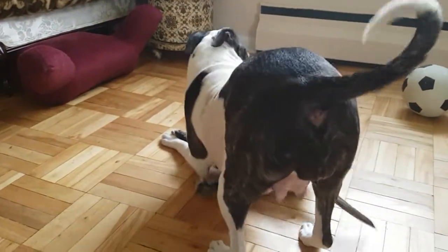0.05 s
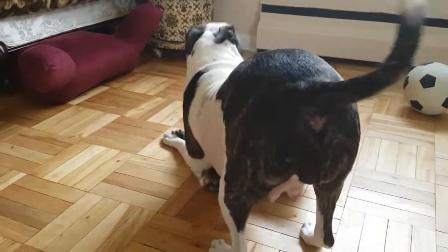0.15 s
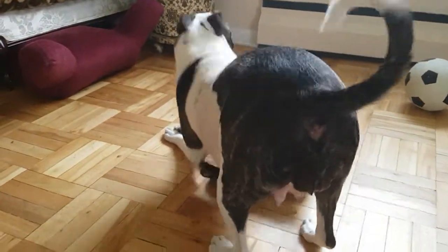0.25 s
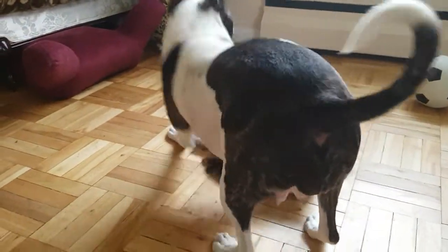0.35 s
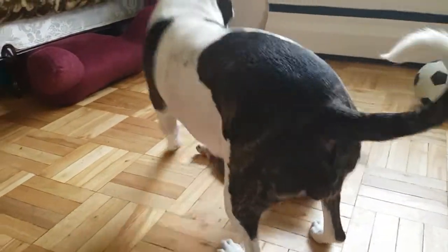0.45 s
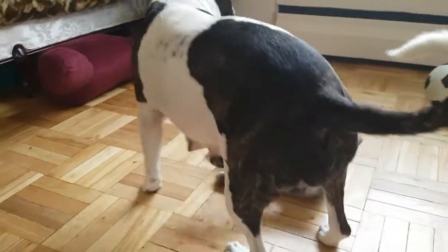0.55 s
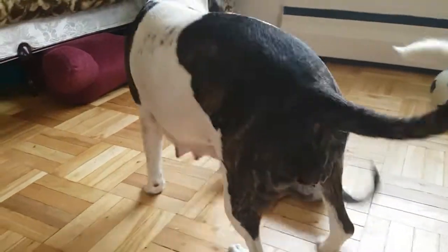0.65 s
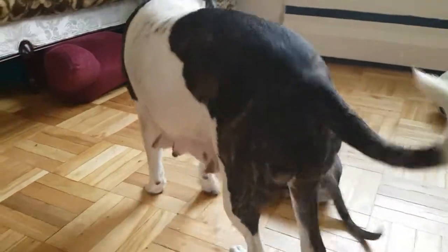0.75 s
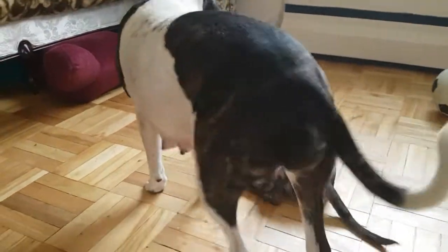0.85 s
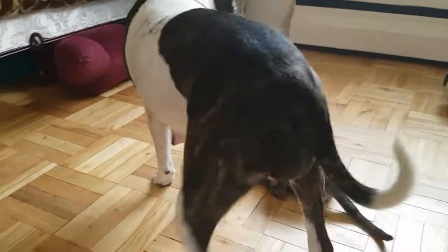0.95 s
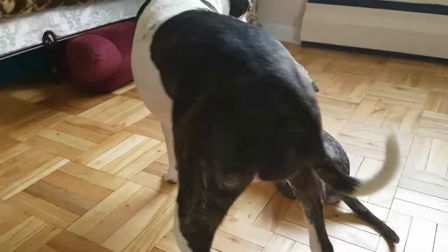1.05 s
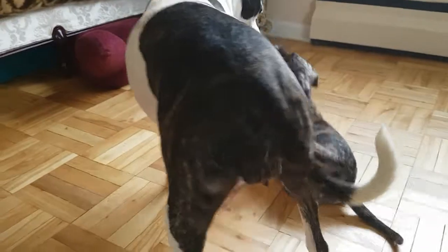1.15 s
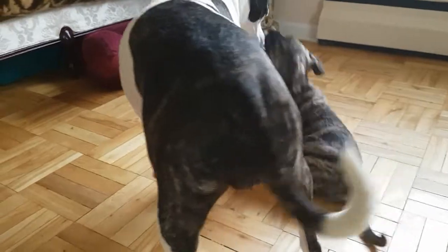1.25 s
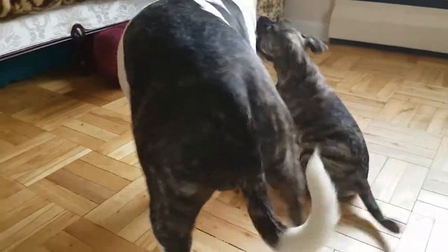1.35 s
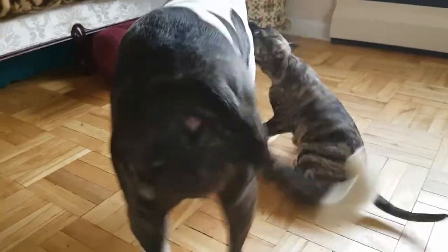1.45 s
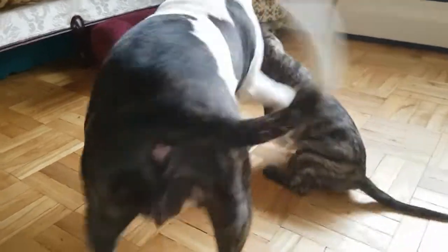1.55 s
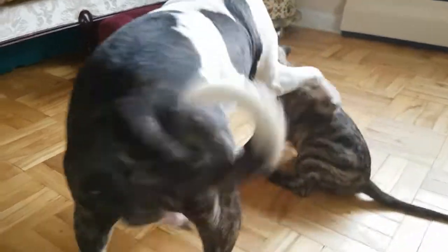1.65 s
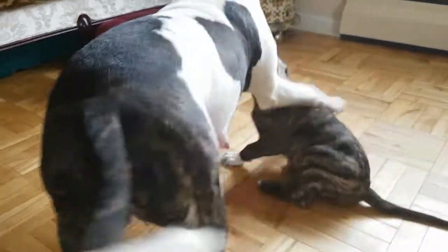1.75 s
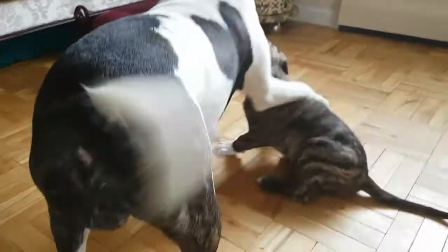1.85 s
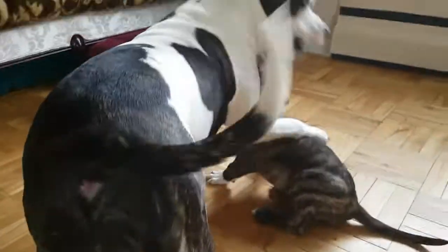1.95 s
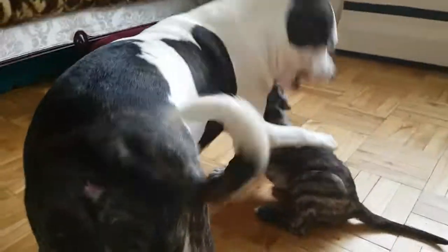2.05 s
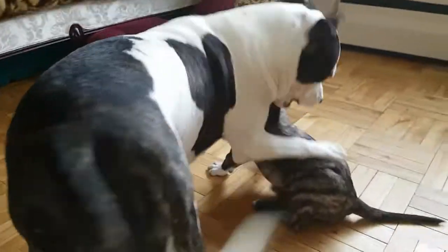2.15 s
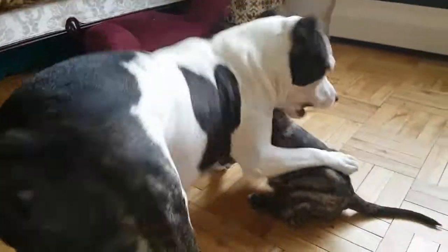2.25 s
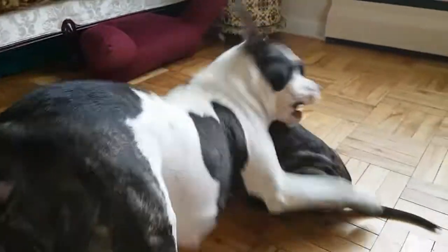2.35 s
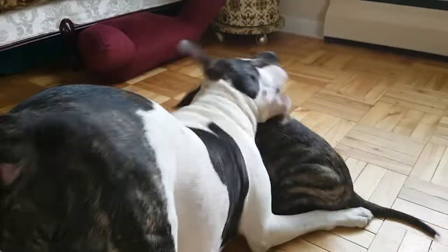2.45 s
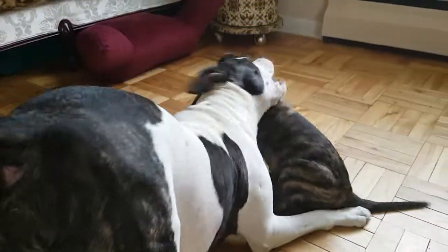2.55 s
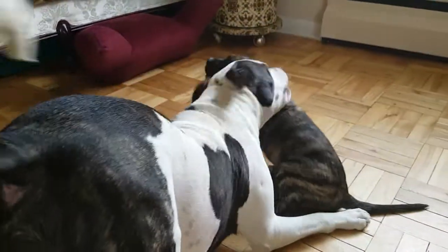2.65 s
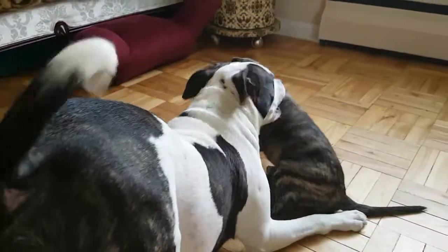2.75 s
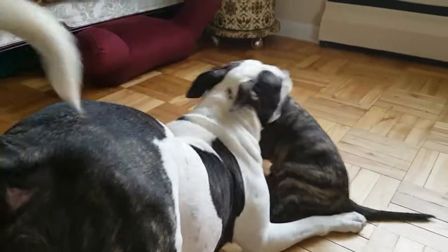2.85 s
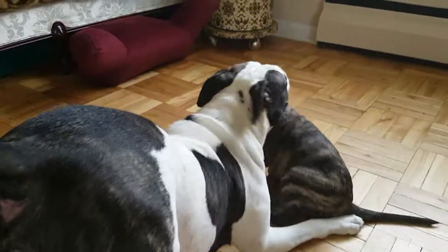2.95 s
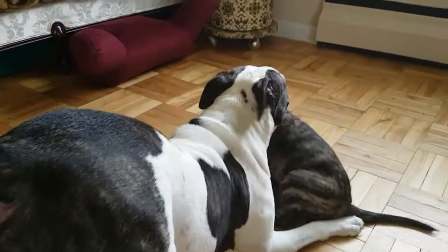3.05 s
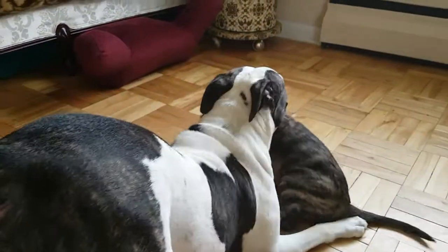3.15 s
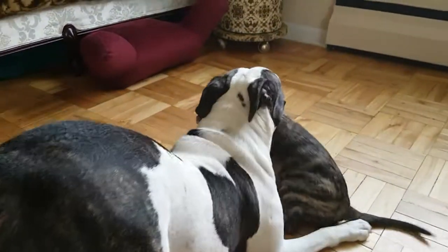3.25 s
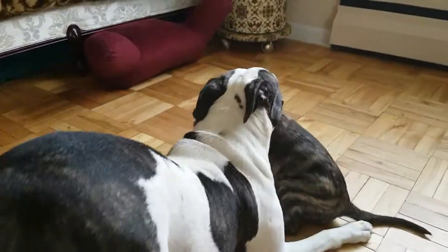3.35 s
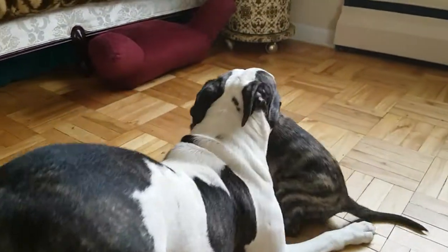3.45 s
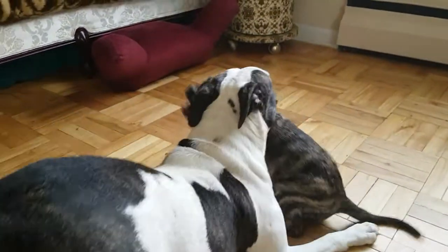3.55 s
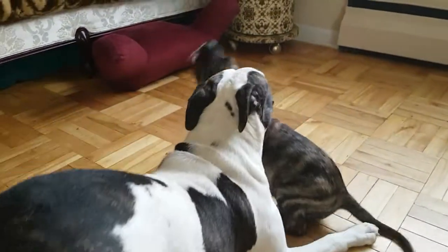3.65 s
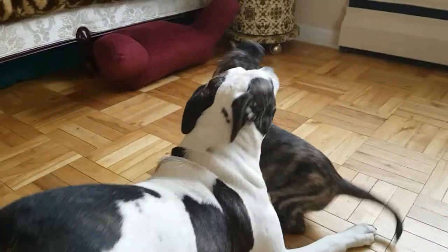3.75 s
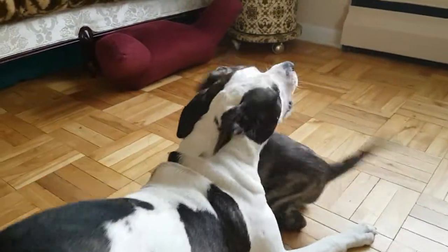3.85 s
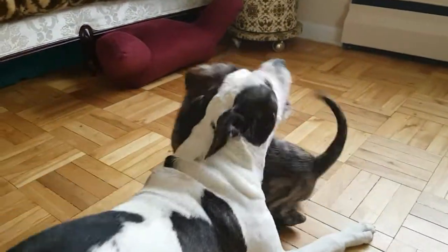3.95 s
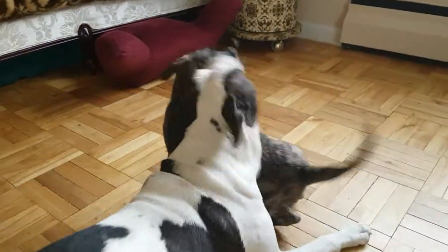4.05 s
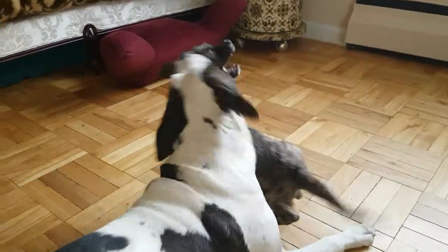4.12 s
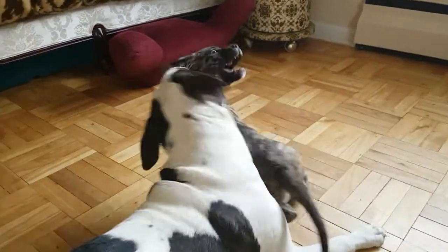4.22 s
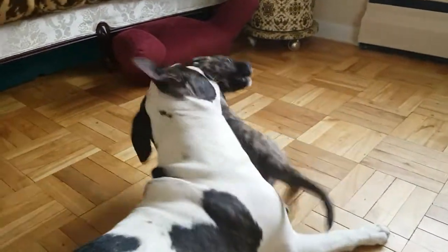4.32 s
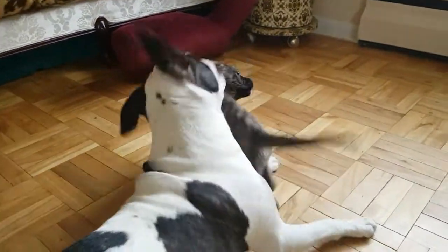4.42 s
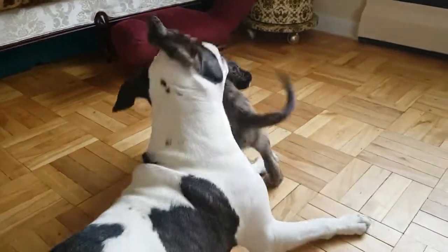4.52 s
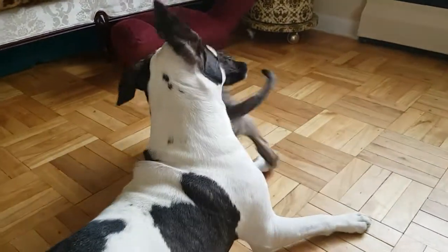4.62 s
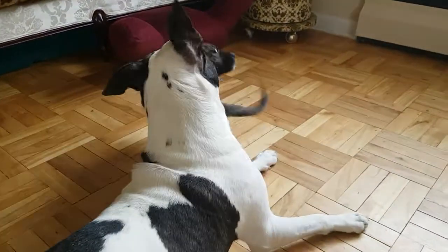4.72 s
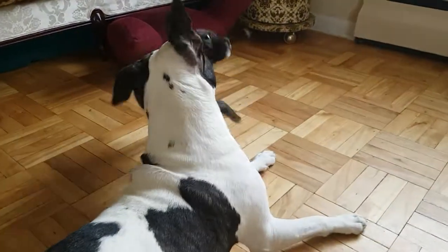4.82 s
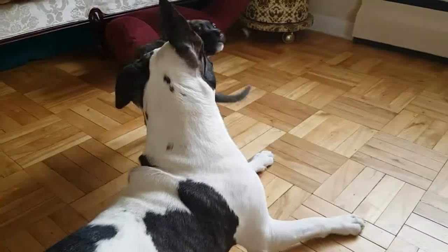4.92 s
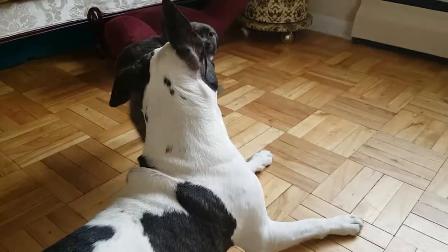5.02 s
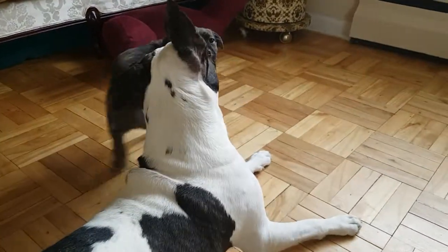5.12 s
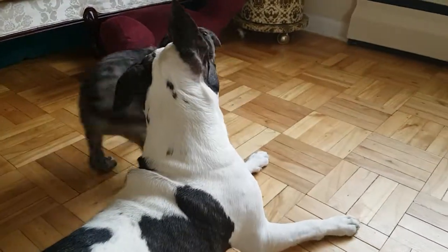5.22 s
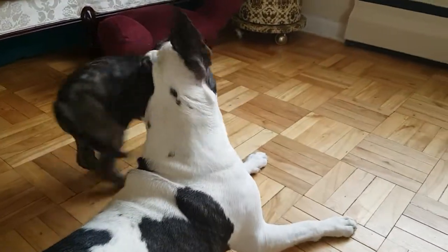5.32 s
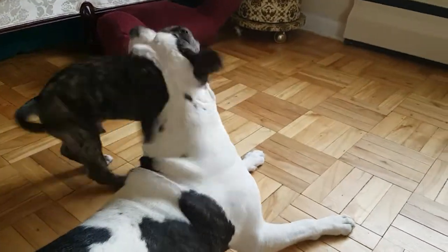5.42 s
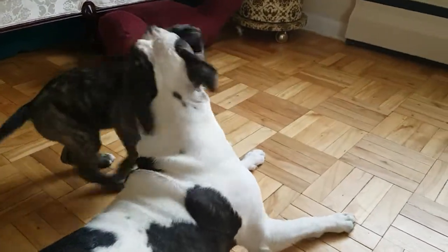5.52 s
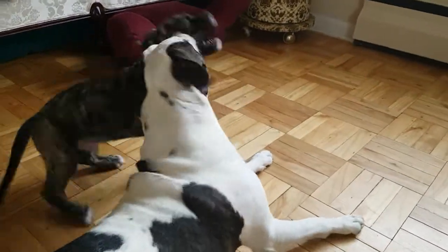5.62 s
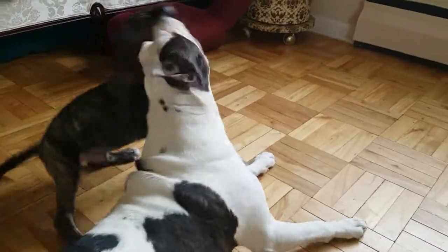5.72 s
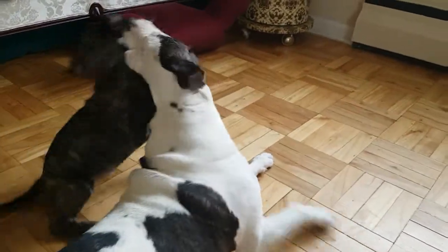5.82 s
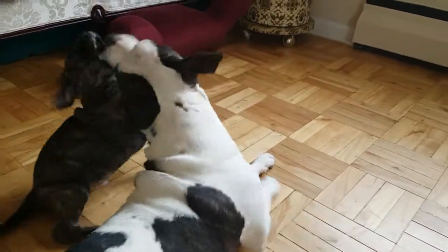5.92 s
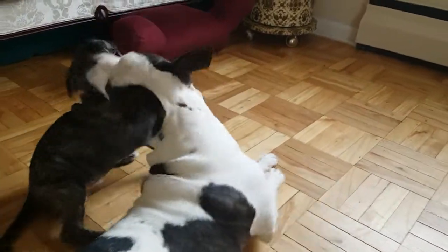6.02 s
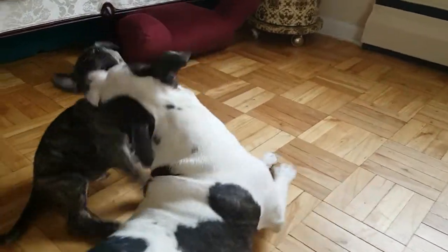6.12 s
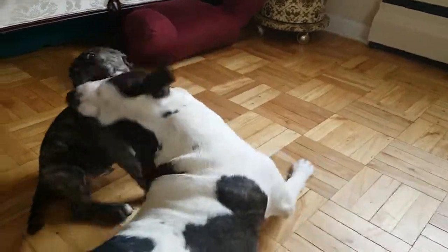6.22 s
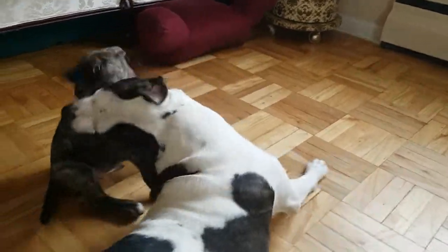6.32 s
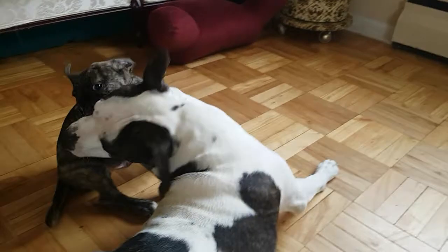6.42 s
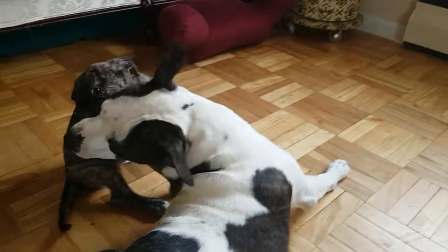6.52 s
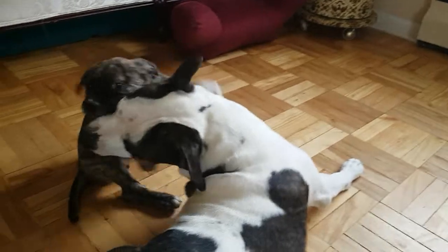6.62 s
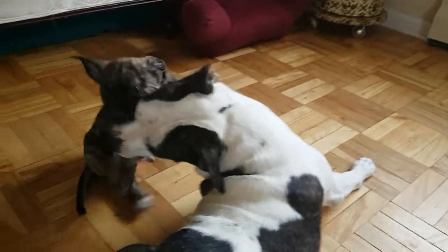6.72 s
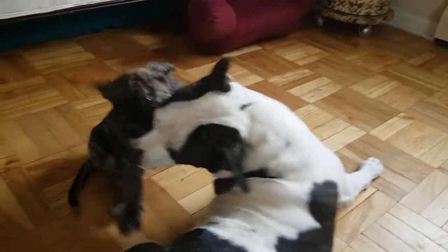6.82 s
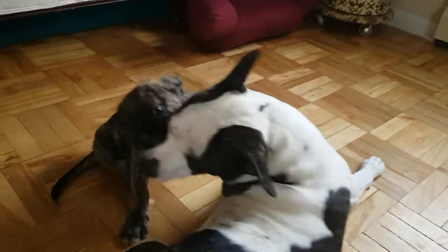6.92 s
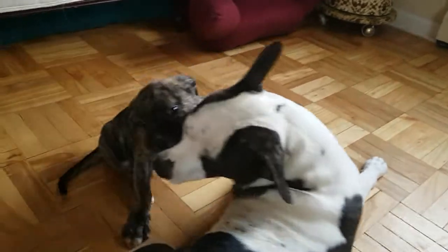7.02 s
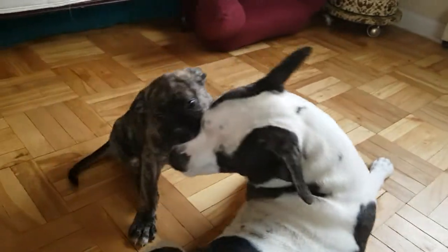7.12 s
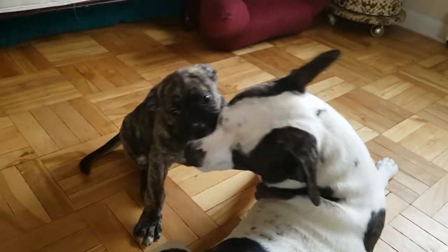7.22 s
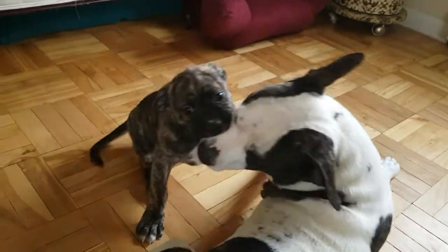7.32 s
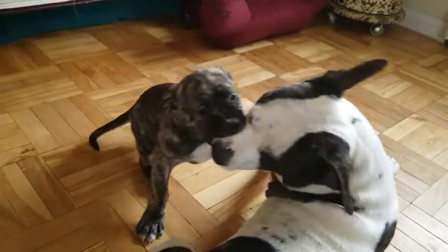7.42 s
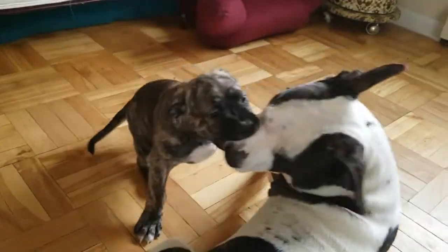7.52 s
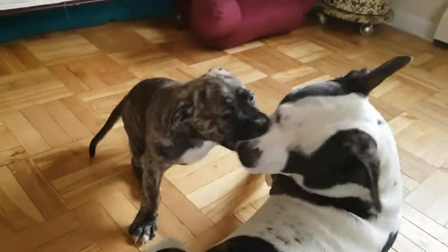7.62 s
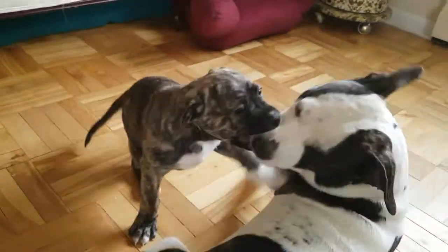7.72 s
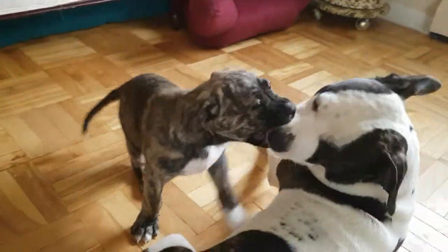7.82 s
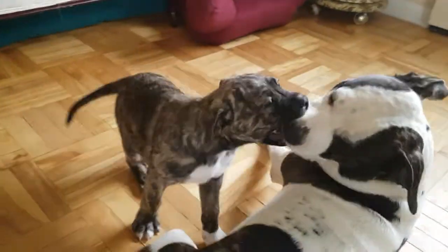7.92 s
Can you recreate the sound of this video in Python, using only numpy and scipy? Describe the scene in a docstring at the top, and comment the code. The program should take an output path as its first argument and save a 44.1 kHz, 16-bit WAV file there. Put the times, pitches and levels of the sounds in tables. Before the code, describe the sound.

Two dogs tussle on a parquet floor: claws click, paws knock and scuff, one heavy hollow thump lands, over a low hum.

```python
"""A small living room with a parquet floor, where a big dog and a puppy wrestle.
Paws knock, skid and scrape: blows ring floor modes, skids and scrapes are band-limited noise and catches.
Claws snap and ring, lips crackle and ring a mouth cavity, coats rub as noise that follows the movement.
Once the big dog drops onto its elbows and the whole deck rings.
Behind them an appliance hums in wavering sines over a bed of noise; echoes and a tail form the room."""
import sys
import numpy as np
from scipy import signal
from scipy.fft import rfft, irfft, next_fast_len
from scipy.io import wavfile
from scipy.ndimage import map_coordinates

SR = 44100
rng = np.random.default_rng(int(sys.argv[2]) if len(sys.argv) > 2 else 0)


def to_wav(s):
    """Save 16-bit WAV."""
    ch = np.atleast_2d(s).T  # columns
    pcm = np.round(np.clip(ch, -1, 1) * 32767)  # PCM
    wavfile.write(sys.argv[1], SR, pcm.astype(np.int16))


N = 351477
TIME = np.arange(N) / SR
AGE = np.arange(SR // 3) / SR  # seconds since a contact


def from_db(db):
    """Amplitude of a level in dB."""
    return 10 ** (np.asarray(db) / 20)


def rms_one(x):
    """Scale to rms 1."""
    return x / np.sqrt(np.mean(x ** 2) + 1e-20)


def attack_one(x):
    """Scale a blow so that its first 8 ms have rms 1."""
    return x / np.sqrt(np.mean(x[:SR // 125] ** 2) + 1e-20)


def at_hz(points, hz):
    """Read a table on a log-frequency axis."""
    table_hz, values = np.array(points).T
    return np.interp(np.log(hz), np.log(table_hz), values)


def cut(x, hz, kind, order=2):
    """Causal Butterworth filter."""
    return signal.sosfilt(signal.butter(order, hz, kind, fs=SR, output="sos"), x)


def band_around(x, hz, width):
    """Pass a band around hz, reaching out by the ratio 1 + width on either side."""
    return cut(x, [hz / (1 + width), hz * (1 + width)], "band")


def drift(rate_hz):
    """Slow random curve with rms 1, from noise through two equal poles."""
    step, settle = 40, 2000  # samples per point, points discarded
    pole = np.exp(-2 * np.pi * rate_hz * step / SR)
    noise = rng.standard_normal(N // step + settle + 2)
    slow = signal.lfilter([1], [1, -2 * pole, pole * pole], noise)[settle:]
    return np.interp(np.arange(N) / step, np.arange(len(slow)), rms_one(slow))


def add(track, s, sound):
    """Mix a sound into a track at time s."""
    start = round(s * SR)
    track[..., start:start + sound.shape[-1]] += sound[..., :N - start]


# Stereo likeness of diffuse sound. Each row: frequency in Hz, left-right correlation.
CORRELATION = [(100, 0.94), (300, 0.76), (600, 0.76), (1100, 0.13), (2800, 0), (6000, 0), (14000, 0)]


def diffuse(spectrum, size):
    """Stereo noise from all around, alike in the bass and unrelated in the treble."""
    hz = np.maximum(np.fft.rfftfreq(size, 1 / SR), 1)
    alike = at_hz(CORRELATION, hz)
    mid, side = rfft(rng.standard_normal((2, size)))
    pair = np.sqrt(1 + alike) * mid + np.sqrt(1 - alike) * side * [[1], [-1]]
    return irfft(from_db(at_hz(spectrum, hz)) * pair, size) / np.sqrt(2)


def steady(spectrum):
    """Diffuse noise for the whole scene, rms 1."""
    return rms_one(diffuse(spectrum, next_fast_len(N))[:, :N])


def struck(modes, spread_db):
    """Modes ringing after one blow, each with a strength that varies from blow to blow."""
    hz, db, t60_s = np.array(modes).T[:, :, None]
    signs = (-1) ** np.arange(len(modes))[:, None]
    gains = signs * from_db(db + spread_db * rng.standard_normal(db.shape) - 60 * AGE / t60_s)
    return attack_one(np.sum(gains * np.sin(2 * np.pi * hz * AGE), axis=0))


def burst(t60_s):
    """Decaying noise of a brief contact."""
    return rng.standard_normal(len(AGE)) * from_db(-60 * AGE / t60_s)


def crack(t60_s):
    """A brief contact that builds within a millisecond and is about equally strong at all pitches."""
    fade = from_db(-60 * AGE / t60_s) * (1 - np.exp(-AGE / .001))
    x = burst(t60_s) * fade ** .5
    for _ in range(2):  # flatten the spectrum, then restore the fade
        x = irfft(np.exp(1j * np.angle(rfft(x))), len(AGE)) * fade ** .5
    return x


# Dogs to microphones. Each row: time in seconds, distance in m.
DISTANCE_M = [(0, 1.7), (0.8, 1.47), (1.5, 0.91), (2.5, 1.27), (4.0, 1.46), (4.7, 2.44), (6.2, 2.7),
              (6.9, 1.03), (7.97, 0.54)]


def distance_m(s):
    """Distance from the dogs to the microphones at time s."""
    return np.interp(s, *np.transpose(DISTANCE_M))


def spread(sound, s, falloff):
    """Direct sound falls as a power of distance, the room send does not. Returns direct and send."""
    return np.array([sound / distance_m(s) ** falloff, sound])


# Rubbing of the dogs. Each row: time in seconds, movement level in dB.
MOVEMENT_DB = [(0.0, -57.5), (0.8, -60.5), (1.11, -67), (1.37, -69), (1.53, -56), (2.0, -65), (2.53, -51.5),
               (2.66, -60), (3.42, -67.5), (4.02, -63), (4.39, -65.5), (4.71, -61), (4.97, -70),
               (5.66, -63.5), (6.26, -60.5), (6.44, -65.5), (7.39, -69.5), (7.97, -67)]
STILL_DB = -71  # movement level at which they lie still
# Spectra of bodies, fur and hiss. Each row: frequency in Hz, density in dB per Hz.
SHUFFLE_SPECTRUM = [(120, 2.5), (250, 1), (400, -0.5), (850, -2), (1300, -8), (2500, -37)]
RUSTLE_SPECTRUM = [(500, -17.5), (1000, -6.5), (1400, -5), (2100, -3.5), (2900, -14.5), (4200, -20.5),
                   (8000, -56)]
SLIDE_SPECTRUM = [(1500, -3), (3000, -5), (4200, -2.5), (5500, -2), (8000, -11), (11000, -4),
                  (16000, -17.5)]
# Modes of single slats. Each row: frequency in Hz, level in dB, t60 in seconds.
SLAT_MODES = [(1056, 2, 0.021), (1260, 8, 0.017), (1500, 3.5, 0.0061), (1820, -4, 0.0069),
              (2250, 5, 0.0077), (2510, -2, 0.005)]


def rubbing(shuffle_db=2.5, slide_db=-9.0, stroke_db=2.0, flutter_db=1.65, ticks_per_s=40, ticks_db=-8):
    """Fur and feet rub in uneven strokes; random catches tick the slats. Returns rub and ticks."""
    level_db = np.interp(TIME, *np.transpose(MOVEMENT_DB))
    moving = np.sqrt(np.maximum(from_db(2 * level_db) - from_db(2 * STILL_DB), 0))
    bodies = from_db(shuffle_db) * steady(SHUFFLE_SPECTRUM) + steady(RUSTLE_SPECTRUM)
    hiss = from_db(slide_db + flutter_db * drift(25)) * steady(SLIDE_SPECTRUM)
    rub = moving * from_db(stroke_db * drift(18.0)) * (bodies + hiss)
    catches = (rng.random(N) < ticks_per_s / SR) * rng.standard_normal(N)
    # deal the catches among several differently struck versions
    versions = len(SLAT_MODES)
    dealt = rng.integers(0, versions, N)
    ticks = np.zeros(N)
    for k in range(versions):
        ticks += signal.oaconvolve(catches * (dealt == k), struck(SLAT_MODES, spread_db=11.5))[:N]
    return rub, rms_one(ticks) * moving * from_db(ticks_db)


# Appliance lines. Each row: frequency in Hz, level in dB rms before trim and waver.
HUM_LINES = [(59.2, -61.5), (86.1, -71.5), (119.0, -61), (200.5, -60)]


def hum(trim_db=-1, waver_db=2, wander_rad=.6):
    """Mains and fan lines that waver in level and pitch."""
    lines = np.zeros(N)
    for hz, db in HUM_LINES:
        phase = 2 * np.pi * (hz * TIME + rng.random()) + wander_rad * drift(5)
        lines += from_db(db + waver_db * drift(3.6)) * np.sin(phase)
    return np.sqrt(2) * from_db(trim_db) * lines


# Background noise. Each row: frequency in Hz, density in dB per Hz.
AIR_SPECTRUM = [(13, -21), (22, -2), (38, -6.5), (115, -1.5), (156, -6), (200, -2.5), (286, -9.5),
                (636, -18), (1020, -18), (1130, -25), (2080, -27.5), (2820, -29), (7810, -39.5),
                (14700, -33), (16000, -34.5)]


def air(level_db=-59):
    """Steady diffuse background noise, strongest in the bass."""
    return from_db(level_db) * steady(AIR_SPECTRUM)


def claw_tap(hz, sharpness_db, ring_db, snap_db=-1, ring_t60_s=0.01, tap_t60_s=0.029, snap_t60_s=0.018,
             tap_db=-12, tap_top_hz=4500, ring_room_db=-5, snap_room_db=-2.5, overtone_ratio=1.945,
             overtone_db=-11, hollow_hz=8000, hollow_q=3.7, high_tone_hz=10500, high_tone_db=-11):
    """A claw snaps on varnish, taps the slat and rings with an overtone. Returns direct and send."""
    tones = np.sin(2 * np.pi * hz * AGE)
    tones -= from_db(overtone_db) * np.sin(2 * np.pi * hz * overtone_ratio * AGE)
    # a faint, high tone over the ring
    tones += from_db(high_tone_db) * np.sin(2 * np.pi * high_tone_hz * AGE)
    ring = from_db(ring_db) * attack_one(tones * from_db(-60 * AGE / ring_t60_s))
    woody = cut(crack(tap_t60_s), [950, 4200], "band")
    tap = from_db(tap_db) * attack_one(cut(woody, tap_top_hz, "low", order=5))
    bright = cut(cut(crack(snap_t60_s), 4500, "high"), 6300, "low", order=1)
    hollowed = signal.lfilter(*signal.iirnotch(hollow_hz, hollow_q, fs=SR), bright)
    snap = from_db(sharpness_db + snap_db) * attack_one(hollowed)
    # the wide slat fills the room better than the small claw does
    return tap + snap * from_db([[0], [snap_room_db]]) + ring * from_db([[0], [ring_room_db]])


# Claws on the varnish. Each row: start in seconds, strength in dB, ring in Hz,
# sharpness in dB before the snap trim, ring level in dB relative to strength.
CLAW_TAPS = [(0.196, -35, 1750, -11, -5.5), (0.552, -29.5, 2110, -10, -11.5), (0.567, -47, 1860, -5, -6),
             (0.625, -50, 2030, -4, -6), (0.7646, -28.5, 1990, -12.5, -7), (0.987, -41.5, 1740, -8.5, -8.5),
             (1.287, -53, 1920, -21, -4.5), (1.486, -39, 1590, -13, -5), (1.496, -37.5, 2000, -2, -4.5),
             (1.501, -36.5, 2280, -8, -11), (1.5687, -34.5, 2160, -9, -1.5),
             (2.4353, -27.5, 3930, -10, -11.5), (2.913, -46, 2670, -19, -7), (4.107, -45, 2760, -4.5, -8.5),
             (4.445, -47, 2130, -13, -8), (4.6595, -37, 2240, -5.5, -4.5), (5.251, -44.5, 2440, -14, -13),
             (5.509, -41, 1640, -9, -12), (6.184, -38.5, 2000, -12.5, -3), (6.246, -40.5, 1670, -16, -13),
             (6.356, -38, 1880, -12.5, -5.5), (6.8907, -40.5, 2060, -13, -3)]


def claws(falloff=1.6, next_toe_s=0.025, next_toe_db=-18.5):
    """Two toes touch down in turn, the second fainter. Returns direct sound and room send."""
    out = np.zeros((2, N))
    for s, strength_db, hz, sharpness_db, ring_db in CLAW_TAPS:
        gains = from_db(strength_db) * spread(np.ones(1), s, falloff)
        add(out, s, gains * claw_tap(hz, sharpness_db, ring_db))
        next_toe = from_db(next_toe_db) * claw_tap(hz, sharpness_db, ring_db)
        add(out, s + next_toe_s, gains * next_toe)
    return out


# Feet scraping the boards. Each row: start in seconds, length in seconds, resonance in Hz, level in dB.
SCRAPES = [(.203, 0.056, 600, -48), (0.764, 0.042, 700, -40.5), (.785, 0.017, 2200, -44.5),
           (1.547, 0.016, 1800, -52), (1.63, 0.017, 1000, -55), (1.712, .03, 1670, -61),
           (1.882, .012, 1100, -68), (1.962, 0.017, 1380, -62.5), (2.117, 0.012, 1200, -69),
           (2.218, 0.013, 900, -65), (2.277, 0.039, 1700, -52.5), (2.443, 0.052, 2210, -46.5),
           (4.069, .015, 1700, -60.5), (4.198, 0.014, 880, -66), (4.202, .008, 4000, -63),
           (4.376, .015, 850, -62), (4.443, 0.013, 850, -63), (4.535, 0.018, 1000, -63),
           (4.631, 0.018, 900, -68), (5.505, 0.046, 1210, -54.5), (5.582, .01, 2400, -61),
           (5.8, 0.011, 1000, -69), (5.944, .01, 1100, -60.5), (6.182, 0.0062, 2280, -52.5),
           (6.205, 0.0094, 900, -52), (6.246, .008, 1100, -54.5), (6.277, 0.0066, 900, -55),
           (6.353, 0.004, 1850, -53)]


def scuffs(catches_per_s=900, size_db=4, width=0.9, grit_db=-17, grit_hz=2600):
    """A foot scrapes briefly: a ragged run of tiny catches, woody below and gritty on top."""
    out = np.zeros(N)
    for s, length_s, hz, level_db in SCRAPES:
        swell = np.sin(np.pi * np.sqrt(np.minimum(AGE / length_s, 1)))
        chance, sizes = rng.random(len(AGE)), rng.standard_normal((2, len(AGE)))
        # at least one catch falls within the louder part
        caught = chance <= max(catches_per_s / SR, np.min(chance[swell > .5]))
        catches = swell * caught * np.sign(sizes[0]) * from_db(size_db * sizes[1])
        grit = from_db(grit_db) * cut(catches, grit_hz, "high", order=1)
        scrape = band_around(catches, hz, width) + grit
        add(out, s, from_db(level_db) * scrape / np.sqrt(np.sum(scrape ** 2) / (length_s * SR)))
    return out


# Floor modes under a blow. Each row: frequency in Hz, level in dB, t60 in seconds.
JOIST_MODES = [(59, -15, 0.26), (79.5, -7.5, 0.31), (126, 3.5, 0.07), (162.4, 9, 0.039)]
BOARD_MODES = [(215, -1, 0.033), (306, -1.5, 0.036), (389, -2, 0.038), (496, 2, 0.02), (553.6, 0.5, 0.027),
               (668, -0.5, 0.017), (773, -10, 0.047), (822, -1.5, 0.018), (1000, 0.5, 0.0074)]


def blow(spot_hz, hardness_db, thud_db, knock_db=-4, clack_db=-3, push_hz=900, push_t60_s=0.0068,
         push_db=5, spot_db_per_octave=11, slat_db=-4, pad_hz=2450):
    """One push on the floor; joists, boards and single slats then ring."""
    push = np.sin(2 * np.pi * push_hz * AGE) * from_db(push_db - 60 * AGE / push_t60_s)
    hard = from_db(min(hardness_db, 0) / 2)  # soft pads blunt the first push
    # each spot favours the board modes near its own pitch
    boards = [(hz, db - spot_db_per_octave * abs(np.log2(hz / spot_hz)), t60_s)
              for hz, db, t60_s in BOARD_MODES]
    knock = attack_one(struck(boards, spread_db=1.5) + hard * push)
    thud = struck(JOIST_MODES, spread_db=3.0)
    slap = attack_one(cut(crack(t60_s=0.0052), [1150, 2300], "band"))
    clack = attack_one(slap + from_db(slat_db) * struck(SLAT_MODES, spread_db=2.0))
    sound = from_db(knock_db) * knock + from_db(thud_db) * thud + from_db(hardness_db + clack_db) * clack
    return cut(sound, pad_hz, "low", order=7)


# Paws and elbows landing. Each row: start in seconds, strength in dB, pitch of the spot in Hz,
# hardness in dB (low for a soft pad, near 0 for bone).
LANDINGS = [(0.204, -35, 500, -13), (0.771, -29, 525, -12), (1.264, -44, 353, -30), (1.546, -44.5, 550, -7),
            (2.181, -50, 660, 1), (2.256, -45, 1000, -3.5), (2.351, -41, 920, -0.5),
            (2.432, -31.5, 626, -4.5), (2.4641, -18, 800, -2), (2.481, -24, 400, -4.5),
            (2.633, -37.5, 1020, -39.5), (3.94, -48.5, 700, -10), (4.091, -44, 447, -8),
            (4.657, -41.5, 724, -3), (4.689, -38, 405, -13), (4.799, -40, 870, -16), (5.512, -46, 850, -4),
            (5.552, -47.5, 380, -12), (5.875, -39.5, 600, -13), (5.950, -45.5, 496, -11),
            (6.025, -40, 520, -9), (6.184, -34, 477, -8), (6.286, -38, 407, -13), (6.355, -45, 486, -7),
            (6.891, -43.5, 720, -8), (7.940, -39, 460, -31)]
# the heel is softer and deeper than the toes
HEEL_S, HEEL_DB, HEEL_PITCH_RATIO, HEEL_HARDNESS_DB = 0.019, -12.5, 0.78, -12
# the joists give more towards the far side of the room
THUD_DB, THUD_DB_PER_M = -22, 6


def knocks(falloff=0.69):
    """A limb lands in two blows, toes then heel. Returns direct sound and room send."""
    out = np.zeros((2, N))
    for s, strength_db, spot_hz, hardness_db in LANDINGS:
        thud_db = THUD_DB + THUD_DB_PER_M * distance_m(s)
        toes = blow(spot_hz, hardness_db, thud_db)
        heel = blow(spot_hz * HEEL_PITCH_RATIO, hardness_db + HEEL_HARDNESS_DB, thud_db)
        add(out, s, spread(from_db(strength_db) * toes, s, falloff))
        add(out, s + HEEL_S, spread(from_db(strength_db + HEEL_DB) * heel, s, falloff))
    return out


# Paws and coats sweeping the wood. Each row: centre in seconds, half length in seconds,
# peak hiss in dB before the strokes.
SWEEP_STROKES = [(0.589, 0.018, -51.5), (0.717, 0.035, -61.5), (0.903, 0.019, -60.5), (1.38, 0.045, -67),
                 (1.578, 0.026, -51.5), (2.288, 0.0099, -59), (2.338, 0.032, -49.5), (2.873, 0.037, -66.5),
                 (4.39, 0.17, -70.5), (5.524, 0.022, -59), (5.732, 0.095, -68), (6.624, 0.068, -72.5),
                 (5.983, 0.075, -64.5), (6.274, 0.087, -66.5)]
# Hiss spectrum. Each row: frequency in Hz, density in dB per Hz.
SWEEP_SPECTRUM = [(1500, -10), (3000, -1), (5000, -5), (8000, -10.5), (11000, -4.5), (16000, -7.5)]


def sweeps(stroke_db=1.5):
    """A sliding paw or coat hisses brightly and unevenly, swelling and fading with its speed."""
    speed = np.zeros(N)
    for s, half_s, db in SWEEP_STROKES:
        speed += from_db(db) * np.exp(-.5 * ((TIME - s) / half_s) ** 2)
    return speed * from_db(stroke_db * drift(25)) * steady(SWEEP_SPECTRUM)


# Pads on the varnish. Each row: start in seconds, length in seconds, resonance in Hz, level in dB.
PAD_SKIDS = [(0.756, 0.015, 1650, -46), (1.409, 0.0093, 824, -52), (1.459, 0.034, 1440, -47),
             (1.913, 0.048, 1490, -56.5), (2.637, 0.013, 1030, -46.5), (2.649, 0.051, 696, -49),
             (4.043, 0.044, 1830, -60), (4.797, 0.021, 1280, -54), (7.782, 0.013, 1930, -68)]


def skids(width=0.22):
    """A pad sticks and slips unevenly: a gated noise burst drives one resonance of the floor."""
    out = np.zeros(N)
    for s, length_s, hz, level_db in PAD_SKIDS:
        slips = burst(t60_s=0.81) * (AGE < length_s)
        squeak = band_around(slips, hz, width)
        add(out, s, from_db(level_db) * squeak / np.sqrt(np.sum(squeak ** 2) / (length_s * SR)))
    return out


# Lips and jaws. Each row: start in seconds, level in dB before the trim, mouth resonance in Hz.
MOUTH_SMACKS = [(1.363,-49.5,920), (2.101,-49.5,1240), (2.959,-45.5,1750), (3.08,-54,1820),
                (3.469,-49,1800), (3.567,-45,1530), (3.633,-48.5,1710), (4.037,-50,1700), (5.358,-48,1500),
                (7.732,-61,2250), (7.828,-60,1410)]


def smacks(trim_db=-4, mouth_t60_s=0.02, wet_db=-2):
    """Parting lips crackle and briefly set the mouth cavity ringing."""
    out = np.zeros(N)
    for s, level_db, hz in MOUTH_SMACKS:
        cavity = attack_one(np.sin(2 * np.pi * hz * AGE) * from_db(-60 * AGE / mouth_t60_s))
        crackle = attack_one(cut(cut(crack(t60_s=0.023), 280, "high"), 2400, "low", order=7))
        add(out, s, from_db(level_db + trim_db) * attack_one(cavity + from_db(wet_db) * crackle))
    return out


# Whole floor deck. Each row: frequency in Hz, level in dB, t60 in seconds.
DECK_MODES = [(60, -12, 0.86), (86.7, -7, 0.57), (111.5, 0.5, 0.41), (160, -1, 0.34), (382, 5, 0.26),
              (459, 2, 0.27), (560, -4, 0.32), (708, -12.5, .3), (765, -7.5, 0.22), (830, 1, 0.16),
              (1298, -4, 0.31), (1526, -14, 0.18), (1880, -12, 0.16), (2090, -22, 0.28)]


def drop(s=2.4645, level_db=-27.5):
    """The big dog's full weight sets the whole deck ringing with a hollow wooden note."""
    out = np.zeros(N)
    add(out, s, from_db(level_db) * struck(DECK_MODES, spread_db=1.5))
    return out


def microphones(x, lag_s=.00003):
    """The dogs move about, so their sound reaches the two microphones a varying moment apart."""
    lag = lag_s * SR * drift(1)
    return np.array([map_coordinates(x, [np.arange(N) + side * lag], order=3) for side in (1, -1)])


# Near walls and ceiling. Each row: delay in seconds, level in dB.
REFLECTIONS = [(.0024, -21), (.0098, -41), (0.015, -9.5), (.026, -36)]
# Tail decay. Each row: frequency in Hz, t60 in seconds.
TAIL_T60_S = [(100, 0.6), (400, 0.5), (1200, 0.36), (3000, 0.39), (6000, 0.37), (14000, 0.4)]
# Tail spectrum. Each row: frequency in Hz, level in dB.
TAIL_DB = [(100, -6.5), (400, -3), (1000, 2), (2000, 0.9), (5000, -3), (14000, -8.5)]


def room(x, build_s=0.0012, wall_hz=3200):
    """A few dull near reflections, then a diffuse tail that decays at its own rate in each band."""
    age = np.arange(SR) / SR
    noise = diffuse(TAIL_DB, size=SR)
    tail, near = np.zeros((2, SR)), np.zeros((2, SR))
    edges_hz = np.geomspace(45, 18000, 10)
    for low, high in zip(edges_hz, edges_hz[1:]):
        t60_s = at_hz(TAIL_T60_S, np.sqrt(low * high))
        fade = from_db(-60 * age / t60_s) * (1 - np.exp(-age / build_s))
        noise = np.roll(noise, SR // 9, axis=1)
        tail += cut(noise, [low, high], "band") * fade / np.linalg.norm(fade)
    for delay_s, db in REFLECTIONS:
        for side in near:  # each reflection meets the two microphones a little apart
            side[round((delay_s + rng.uniform(0, .0008)) * SR)] += from_db(db)
    return signal.oaconvolve(x[None], tail + cut(near, wall_hz, "low"), axes=1)[:, :N]


def scene(skid_room_db=-2, floor_pan_db=0.2, claw_pan_db=-0.6, knock_room_db=-1.5, scuff_room_db=-3,
          deck_room_db=-14):
    """The dogs in front of the microphones, the room around them."""
    rub, ticks = rubbing()
    claw, claw_send = claws()
    knock, knock_send = knocks()
    scuff, skid, smack, deck = scuffs(), skids(), smacks(), drop()
    sides = np.array([[1], [-1]])
    floor = microphones(knock + deck + smack + skid + scuff + ticks)
    direct = floor * from_db(floor_pan_db * sides) + microphones(claw) * from_db(claw_pan_db * sides)
    send = from_db(knock_room_db) * knock_send + from_db(deck_room_db) * deck
    send += from_db(skid_room_db) * skid + from_db(scuff_room_db) * scuff
    wet = room(send + claw_send + smack + ticks)
    return direct + wet + rub + sweeps() + hum() + air()


def record(dry, cutoff_hz=15900):
    """The top is cut steeply."""
    return signal.sosfilt(signal.ellip(10, .1, 80, cutoff_hz, fs=SR, output="sos"), dry)


dry = scene()
out = record(dry)
to_wav(out)
```